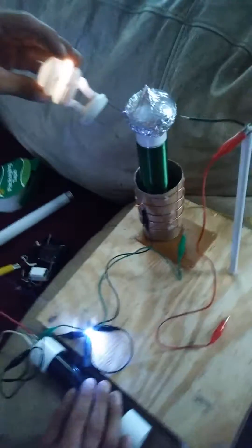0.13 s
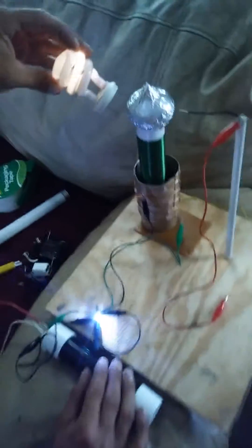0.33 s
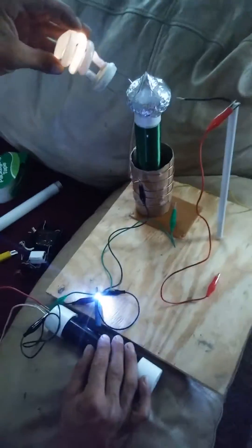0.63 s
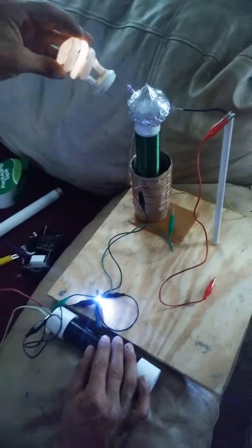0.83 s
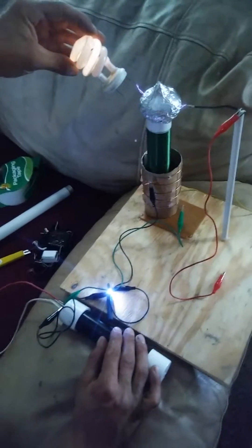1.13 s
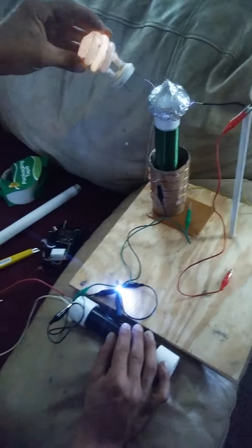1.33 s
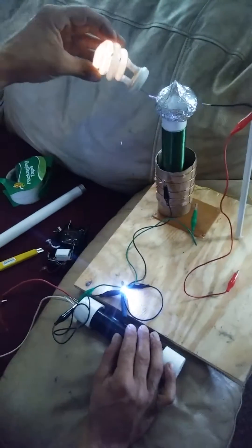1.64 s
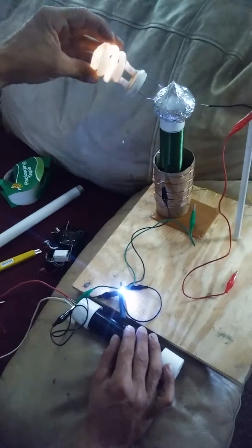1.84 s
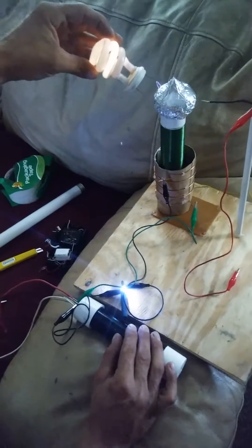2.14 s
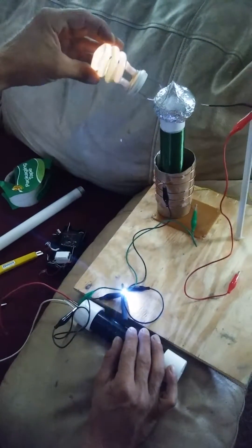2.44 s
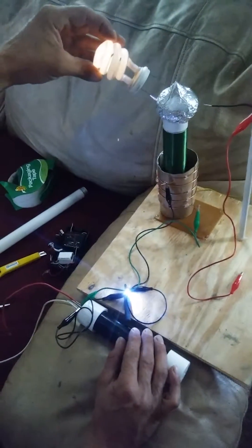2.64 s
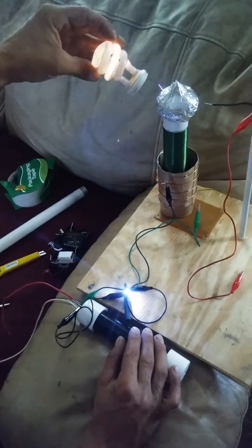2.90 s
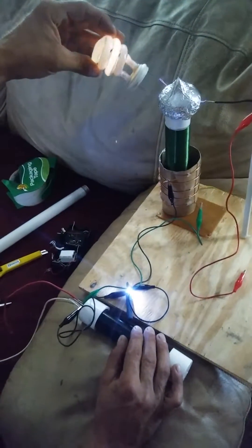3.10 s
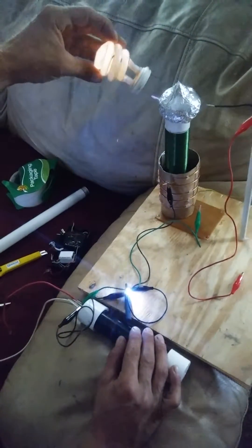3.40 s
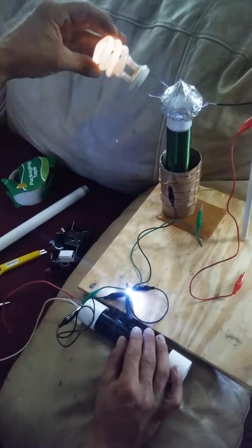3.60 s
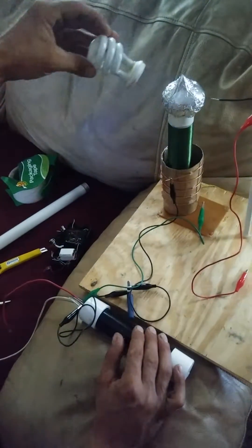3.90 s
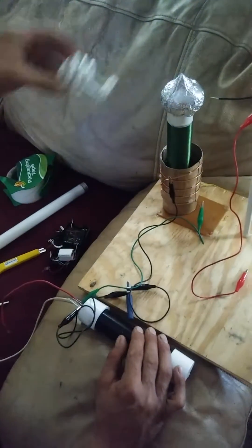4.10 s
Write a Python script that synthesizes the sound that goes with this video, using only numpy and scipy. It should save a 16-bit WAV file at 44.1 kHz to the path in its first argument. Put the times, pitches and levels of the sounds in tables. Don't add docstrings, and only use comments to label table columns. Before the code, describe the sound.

Indoors, near a wooden board, electric sparks snap so fast they form a raspy, sizzling buzz. It is loudest and slightly overloaded at the start, with low thumps and ticks picked up by the microphone wiring, then steadies with shifting treble colour. Near the end it cuts out, leaving a short reverberant tail, quiet room noise and a thin steady whine.

```python
import sys
import numpy as np
from scipy import signal
from scipy.io import wavfile
from scipy.ndimage import uniform_filter1d

SR = 44100
rng = np.random.default_rng(int(sys.argv[2]) if len(sys.argv) > 2 else 0)


def wav_record(signal):
    frames = np.transpose(np.atleast_2d(signal))
    bounded = np.clip(frames, -1, 1)
    quanta = np.round(bounded * 32767).astype(np.int16)
    wavfile.write(sys.argv[1], SR, quanta)


def gain_from_decibels(decibels):
    exponent = np.asarray(decibels, float) / 20
    return 10 ** exponent


N = 187622

# (time [s], sparks so far [count])
SPARK_COUNT = [(0.001, 0), (0.036, 2), (0.1493, 9), (0.229, 14), (0.2594, 16), (0.2901, 18), (0.4706, 30),
               (0.518, 33), (0.7918, 51), (0.8396, 54), (0.8878, 57), (0.9211, 59), (0.9541, 61),
               (0.9875, 63), (1.1413, 72), (1.2503, 79), (1.2806, 81), (1.3132, 83), (1.4075, 89),
               (1.4713, 93), (1.5041, 95), (1.6032, 101), (1.6781, 106), (1.7414, 110), (1.7739, 112),
               (1.909, 121), (1.9558, 124), (2.0053, 127), (2.0822, 132), (2.2024, 140), (2.2513, 143),
               (2.2972, 146), (2.3852, 152), (2.4165, 154), (2.4628, 157), (2.512, 160), (2.5619, 163),
               (2.6111, 166), (2.6428, 168), (2.6913, 171), (2.7488, 175), (2.7805, 177), (2.8272, 180),
               (2.9211, 186), (2.9529, 188), (3.0738, 196), (3.106, 198), (3.155, 201), (3.1878, 203),
               (3.2204, 205), (3.2846, 209), (3.3456, 213), (3.4121, 217), (3.5302, 224), (3.5618, 226),
               (3.5936, 228), (3.6886, 234), (3.7205, 236), (3.7695, 239), (3.8167, 242)]


def firing():
    charge_s, stroke_s, jitter_s = .0148, .0024, .0002
    times = []
    for (start, before), (end, after) in zip(SPARK_COUNT, SPARK_COUNT[1:]):
        count = round(after - before)
        scatter = jitter_s * rng.standard_normal(32)[:count]
        late = round((end - start - count * charge_s) / stroke_s)
        gaps = stroke_s * (np.arange(count) >= count - late) + scatter
        gaps += (end - start - gaps.sum()) / count
        times.append(end - np.cumsum(gaps[::-1])[::-1])
    return np.append(np.concatenate(times), SPARK_COUNT[-1][0])


# (time [s], level [dB])
CRACK_LEVEL = [(0, -5.5), (.3, -7), (.6, -9), (1.1, -10.5), (1.6, -11), (2.3, -11), (3.3, -10.5),
               (4.3, -10)]
# (time [s], place [0-3])
MIC_PLACE = [(0, 0), (.3, .1), (.55, 1), (.8, 1.1), (1.1, 2), (1.5, 2.2), (2.2, 3), (3.3, 2.8), (4.3, 3)]


def cracks(times):
    t = np.arange(N) / SR
    level_db = np.interp(t, *np.transpose(CRACK_LEVEL))
    place = np.interp(t, *np.transpose(MIC_PLACE))
    closeness = np.pi / 2 * np.clip(place - 1, 0, 1)
    clicks = train(times, gain_from_decibels(.6 * rng.standard_normal(len(times))))
    air = through_air(clicks, place, closeness)
    return gain_from_decibels(level_db) * (fringes(air) + board(clicks, closeness))


# (frequency [Hz], level [dB])
CRACK_FAR_COLOUR = [(350, -93), (700, -19), (1300, -10), (1800, -3.5), (2100, -3), (3000, 0), (4000, -3),
                    (6300, 7), (8300, -5.5), (11000, 0), (14000, -10), (15700, 4.5)]
# (frequency [Hz], level [dB])
CRACK_NEAR_COLOUR = [(350, -105), (700, -6.5), (1300, -7), (1800, -5), (2100, 1.66), (3000, -0.4),
                     (4000, 0.4), (6300, 8), (8300, -0.5), (11000, 1.5), (14000, 2), (15700, 2.5)]
# (frequency [Hz], width [Hz], lift [dB], negative for a dip)
CLOSE_RIPPLES = [(3134, 50, 2), (3907, 50, 2), (5560, 120, 2.5), (6050, 100, 1), (13640, 100, 1),
                 (8610, 300, -3), (9600, 300, -2), (10160, 250, 3.5), (11370, 300, -4), (11880, 300, 3.5),
                 (13900, 250, 3), (14200, 250, -3.5), (14600, 300, 3.5), (15050, 300, -3)]


def through_air(clicks, place, closeness):
    wet = reverberation(clicks, place)
    early = early_echoes(clicks, place)
    far = early[0] + early[1] + np.cos(closeness) * wet
    close = early[2] + early[3] + np.sin(closeness) * wet
    far_db = 0.6
    far = gain_from_decibels(far_db) * colour(far, CRACK_FAR_COLOUR)
    return evened(far + colour(close, CRACK_NEAR_COLOUR, CLOSE_RIPPLES))


# (delay [ms], signed size [ratio])
FAR_ECHOES = [(0.113, 1.6), (0.272, 1.25), (0.59, 0.8), (0.907, -1.39), (1.088, 1.21), (1.156, 1.59),
              (1.429, 0.7), (2.109, -0.7), (2.177, -0.91), (2.88, -0.7), (3.424, -1.07), (3.492, -1.8),
              (3.56, -0.79), (3.719, -0.79), (3.923, 0.69), (5.17, 0.87), (5.238, 0.64), (6.576, -0.6),
              (8.39, 0.8), (8.594, -0.59), (9.025, -1.01), (9.093, -0.65), (10.181, 1.5), (10.544, -1.21),
              (10.68, -0.99), (10.952, -0.77), (11.179, 1.28), (12.449, 0.9), (12.585, 0.98),
              (13.515, -0.61), (13.968, 0.61), (14.331, -0.55)]
# (delay [ms], signed size [ratio])
MOVING_ECHOES = [(-0.023, -0.76), (0.113, 0.94), (0.272, 1.3), (0.612, 1.2), (0.93, -1.17), (1.088, 1.07),
                 (1.156, 0.9), (1.27, -0.58), (1.678, -0.66), (2.789, -0.77), (2.857, -1.35), (2.925, -1.1),
                 (3.424, 0.71), (3.56, -1.31), (3.628, -1.03), (3.81, -0.99), (4.014, 0.69), (5.442, -0.79),
                 (6.621, -0.81), (7.415, 0.66), (8.934, -1.17), (9.637, -0.69), (10.023, -0.7), (10.3, 0.9),
                 (10.499, -1.2), (10.72, 1.5), (10.998, -1.16), (11.837, -0.74), (12.018, -0.78),
                 (12.404, 1.23), (12.472, 0.94), (12.653, -0.85), (13.311, 1.03), (14.036, -0.67)]
# (delay [ms], signed size [ratio])
CLOSER_ECHOES = [(-0.023, -0.94), (0.385, -1.72), (0.454, -1.3), (0.862, -0.82), (1.088, 1.13),
                 (1.361, 1.04), (1.497, 0.71), (2.018, -0.75), (2.698, 0.8), (2.834, -1.38), (2.902, -0.96),
                 (3.741, 0.92), (4.218, -0.98), (5.329, 0.5), (6.848, -1.23), (7.8, 1.07), (7.914, -1.41),
                 (8.254, -1.02), (8.707, 0.84), (8.866, -0.74), (9.32, 0.87), (9.728, 0.74), (9.932, -0.94),
                 (10.317, 1.12), (10.658, 1.6), (10.794, 0.97), (11.043, 0.9), (12.336, 1.08),
                 (12.562, -0.9), (13.447, 0.86), (13.56, 0.6), (14.014, -0.6)]
# (delay [ms], signed size [ratio])
NEAR_ECHOES = [(0.113, 1.03), (0.272, 1.26), (0.385, -1.51), (0.454, -0.88), (0.658, 0.86), (0.839, -0.79),
               (0.975, -1.16), (3.628, -0.74), (3.764, 1.34), (4.059, 0.84), (4.24, -0.83), (4.422, 0.9),
               (4.671, 0.69), (5.351, 0.89), (6.281, 0.85), (6.871, -0.98), (7.438, -1.01), (7.506, -0.8),
               (7.778, 0.69), (7.937, -1.43), (8.277, -1.32), (8.753, 0.81), (9.955, -1.46),
               (10.249, -0.87), (10.476, -0.89), (10.93, -0.9), (10.998, -1.19), (11.202, -1.46),
               (12.358, 0.87), (12.608, -1.04), (12.971, -0.74), (13.469, 0.72)]
# (delay [ms], signed size [ratio])
BRIGHT_SNAPS = [
    [(-0.023, 1.72), (0.045, 1.62), (0.136, -0.65), (0.204, -0.84), (0.363, 0.76), (0.499, -0.47),
     (0.839, 0.5), (1.02, -0.45), (1.202, 0.77), (1.383, 0.5), (1.927, -0.69), (7.2, -0.6), (7.7, 1.3),
     (8.3, 0.6), (8.889, -0.51), (10.522, 0.52), (10.816, -0.5)],
    [(-0.068, -1.1), (0.0, -2.25), (0.136, 0.84), (0.204, -1.27), (0.34, -0.56), (0.794, -0.67),
     (1.406, -0.6), (7.2, -1.4), (7.8, 0.8), (8.4, -0.7), (8.662, 0.39), (10.181, -0.49), (10.544, -0.75),
     (11.111, 0.61), (11.179, -0.9), (12.041, 0.47), (12.608, 0.47)],
    [(0.0, -2.58), (0.227, 0.83), (0.363, 0.83), (0.794, -0.87), (1.361, 1.43), (1.429, -1.33),
     (4.49, 0.67), (7.438, 1.6), (8.662, 0.94), (8.912, 0.63), (9.342, -0.96), (10.431, -0.85),
     (10.658, 0.6), (11.088, -0.5)],
    [(-0.023, 1.25), (0.045, 1.55), (0.159, 0.79), (0.771, -0.82), (1.293, 0.6), (1.519, -0.64),
     (7.46, 1.72), (8.685, 0.64), (8.844, 1.55), (9.342, 0.82), (9.728, 0.67), (10.408, 1.01),
     (10.522, 0.68), (11.202, -0.85)],
]


def early_echoes(clicks, place):
    shares = np.cos(np.pi / 2 * np.clip(place - np.arange(4)[:, None], -1, 1))
    echoes = FAR_ECHOES, MOVING_ECHOES, CLOSER_ECHOES, NEAR_ECHOES
    early = []
    for share, dull, bright in zip(shares, echoes, BRIGHT_SNAPS):
        heard = signal.oaconvolve(clicks * share, arrivals(dull, bright))
        early.append(heard[round(.002 * SR):][:N])
    return early


def arrivals(echoes, snaps):
    split_hz, lowest_hz, snap_db = 8500, 1250, 2.3
    dull, bright = (impulses(points) for points in (echoes, snaps))
    below = signal.butter(2, split_hz, fs=SR, output="sos")
    dull = signal.sosfiltfilt(signal.butter(2, lowest_hz, "high", fs=SR, output="sos"), dull)
    bright = bright - signal.sosfiltfilt(below, bright)
    return signal.sosfiltfilt(below, dull) + gain_from_decibels(snap_db) * bright


def impulses(points):
    delay_ms, size = np.transpose(points)
    return train(.002 + delay_ms / 1000, size)[:1000]


def reverberation(clicks, place):
    wet_db = 10.3
    turn_hz = .5 - .14 * place
    phase = 2 * np.pi * (np.cumsum(turn_hz) / SR + np.arange(3)[:, None] / 3)
    shares = np.cos(phase) * np.sqrt(2 / 3)
    wet = signal.oaconvolve(clicks * shares, tails(count=3), axes=1)[:, :N]
    return gain_from_decibels(wet_db) * wet.sum(0)


# (frequency [Hz], time to fall 60 dB [s], share [dB])
ROOM_DECAY = [(300, .15, -8), (800, .28, -4), (1600, .35, 1), (3200, .33, 0), (6400, .305, -1.5),
              (8500, .26, -5), (10000, .24, -5), (16000, .2, -5)]


def tails(count):
    length, spacing = SR // 2, 12
    taps = np.zeros((count, length))
    spots = np.arange(0, length - spacing, spacing)
    at = spots + rng.integers(0, spacing, (count, len(spots)))
    np.put_along_axis(taps, at, rng.choice([-1., 1.], at.shape), 1)
    swell_s = .013
    taps *= np.clip(np.arange(length) / SR / swell_s, .3, 1) ** 2
    hz, t, z = signal.stft(taps, SR, nperseg=128)
    share_db = read(ROOM_DECAY, hz, axis=2)[:, None]
    decay_db = -60 * t / read(ROOM_DECAY, hz)[:, None]
    tail = signal.istft(z * gain_from_decibels(share_db + decay_db), SR, nperseg=128)[1]
    return tail / np.linalg.norm(tail, axis=1, keepdims=True)


# (middle [s], length [s], frequency [Hz], width [Hz], gain [dB])
ECHO_FRINGES = [(0.32, .4, 2670, 170, -11), (0.65, 0.14, 5130, 500, -15), (0.26, 0.26, 1600, 250, -4),
                (0.31, 0.23, 7050, 170, -5), (0.16, 0.074, 6100, 430, -16), (0.34, 0.35, 6700, 300, 3.5),
                (1.2, 0.23, 7050, 250, 2), (0.42, .3, 3900, 150, -6), (0.15, 0.26, 3330, 270, 2),
                (0.66, 0.31, 2160, 550, 3), (.6, 0.37, 8600, 280, -1), (2, 0.69, 11000, 210, 3),
                (1.5, 1.6, 7200, 400, 1), (3.1, 1.5, 6980, 490, 3), (2.6, 0.54, 2800, 600, 1.5),
                (2.4, 2.3, 2890, 180, -3), (2.0, 3.4, 3400, 360, 3.5), (1, 1.1, 15000, 610, -5),
                (5.2, 1.22, 15000, 200, -5.5), (3.72, 0.48, 4500, 400, 2), (0.5, 0.89, 13500, 1000, 9.5),
                (1.1, 1.0, 14700, 400, 8), (1.5, .9, 13700, 700, 1), (0.72, 0.66, 7400, 450, 3.5),
                (0.25, 0.72, 3360, 200, -5), (0.32, 0.59, 5500, 400, -5.5), (1.3, 1.4, 9000, 300, 5.5),
                (0.54, 0.61, 4430, 460, 5), (1.4, .9, 11000, 300, -4), (2.7, 2.8, 10400, 340, -2.5),
                (2.5, 2.2, 11000, 380, 4.5)]


def fringes(x):
    hz, t, z = signal.stft(x, SR, nperseg=512)
    gain_db = 0
    for middle_s, length_s, centre_hz, width_hz, db in ECHO_FRINGES:
        across = (2 * (hz[:, None] - centre_hz) / width_hz) ** 2
        along = (2 * (t - middle_s) / length_s) ** 4
        gain_db = gain_db + db * np.exp(-across - along)
    return signal.istft(z * gain_from_decibels(gain_db), SR, nperseg=512)[1][:N]


# (frequency [Hz], level [dB rms], time to fall 60 dB [s], only close up [0 or 1])
BOARD_TONES = [
    (750, -37, 0.08, 1),
    (945, -33.5, 0.06, 0),
    (1150, -37, .04, 0),
]


def board(clicks, closeness):
    t = np.arange(SR // 2) / SR
    out = 0
    for k, (hz, db, t60_s, near) in enumerate(BOARD_TONES):
        ring = gain_from_decibels(-60 * t / t60_s) * np.sin(2 * np.pi * hz * t)
        tone = evened(signal.oaconvolve(clicks, ring)[:N])
        out = out + (-1) ** k * gain_from_decibels(db) * np.sin(closeness) ** (2 * near) * tone
    return out


# (time [s], level [dB])
WIRING_COUPLING = [(0, -6), (.3, 0.5), (.55, -16), (.95, -8.5), (1.15, -6), (1.4, -2), (1.65, -4),
                   (2.0, -9.5), (2.3, -10), (2.5, -3.5), (2.8, -7), (3.1, -4.5), (3.4, -8), (3.75, -10)]


def pops(times):
    coupling_db = np.interp(times, *np.transpose(WIRING_COUPLING))
    luck = np.clip(rng.standard_normal((len(times), 3)), -2, 2)
    tick = gain_from_decibels(-13 + 0.3 * coupling_db + 2.57 * luck[:, 0])
    swing = gain_from_decibels(-24.5 + coupling_db) * (1 + .5 * luck[:, 2])
    thump = gain_from_decibels(-31.5 + 0.36 * coupling_db) * (.5 + luck[:, 1])
    start, swing_lag_s = times - .0017, .0015
    out = signal.oaconvolve(train(start, tick), pop(0.000092, 173, dip=0.36))[:N]
    swing_pop = pop(0.001, 110, dip=0, rise_s=0.0005)
    out -= signal.oaconvolve(train(start + swing_lag_s, swing), swing_pop)[:N]
    out += signal.oaconvolve(train(start, thump), pop(0.0018, 45, dip=0))[:N]
    wiring_hz, deepest_hz = 1460, 40
    out = band(band(out, wiring_hz, "low"), wiring_hz, "low")
    return band(out, deepest_hz, "high") + stray_arcs()


# (time [s], peak level [dB], polarity [-1 or 1], sharpness [0-1])
STRAY_ARCS = [(.0183, -3, -1, 1), (.0365, -8, 1, 1), (.0826, -12, 1, 1), (.0990, -21, -1, 0),
              (.1163, -9, 1, 1), (.1495, -23, 1, 0), (.2303, -21, -1, 0), (.2457, -14, -1, .5),
              (.2612, -23, -1, 0), (1.3156, -25, -1, 0), (1.6349, -22, -1, 0), (1.6499, -22, -1, 0),
              (3.1898, -18, -1, 0), (3.2218, -23, -1, 0), (3.7536, -24, -1, 0)]


def stray_arcs():
    s, peak_db, polarity, sharp = np.transpose(STRAY_ARCS)
    size = gain_from_decibels(peak_db) * polarity
    sharp_clicks = train(s - .002, size * .8 * sharp)
    round_clicks = train(s - .002, size * (1 - .6 * sharp))
    arcs = signal.oaconvolve(sharp_clicks, pop(.005, 90, dip=1.3, rise_s=.0005))[:N]
    return arcs + signal.oaconvolve(round_clicks, pop(.004, 90, dip=0, rise_s=.0008))[:N]


def pop(width_s, cut_hz, dip, rise_s=.00025):
    t = np.arange(-.002, .05, 1 / SR)
    kick = np.exp(-np.maximum(t, 0) / width_s - (np.minimum(t, 0) / rise_s) ** 2)
    kick -= dip * np.exp(-((t + 1.8 * rise_s) / .00025) ** 2)
    shape = band(kick, cut_hz, "high")
    return shape / shape.max()


# (frequency [Hz], level [dB rms])
SUPPLY_WHINE = [
    (1001, -58.5),
    (1915.5, -48.5),
    (3831, -65),
]


def supply():
    t = np.arange(N) / SR
    whine = sum(np.sqrt(2) * gain_from_decibels(db) * np.sin(2 * np.pi * hz * t) for hz, db in SUPPLY_WHINE)
    buzz_hz, buzz_db, mains_hz = 7410, -64, 60
    wobble = np.cumsum(uniform_filter1d(rng.standard_normal(N), 300)) * 0.091
    gate = np.sqrt(.5 + .5 * np.cos(2 * np.pi * mains_hz * t))
    buzz = gate * np.sin(2 * np.pi * buzz_hz * t + wobble)
    return whine + gain_from_decibels(buzz_db) * evened(buzz)


# (frequency [Hz], level [dB])
HUM_COLOUR = [(41, -68), (70, -18), (199, -10.5), (330, -3), (494, -10), (593, -11.5), (1000, -10.5),
              (1310, -11.5), (1890, -11), (2070, -9), (5500, -24), (7390, -26), (8660, -34), (16000, -32)]


def room_hum():
    hum_db = -36.5 - 11.5
    return gain_from_decibels(hum_db) * evened(colour(rng.standard_normal(N), HUM_COLOUR))


def train(times, sizes):
    out = np.zeros(N)
    np.add.at(out, np.clip(np.round(times * SR).astype(int), 0, N - 1), sizes)
    return out


def colour(x, points, rings=()):
    hz = abs(np.fft.fftfreq(8192, 1 / SR))
    gain_db = read(points, hz)
    for centre_hz, width_hz, db in rings:
        gain_db = gain_db + db / (1 + (2 * (hz - centre_hz) / width_hz) ** 2)
    spectrum = np.exp(np.conj(signal.hilbert(np.log(gain_from_decibels(gain_db)))))
    taps = np.fft.ifft(spectrum).real[:2048]
    return signal.oaconvolve(x, taps)[:N]


def read(points, hz, axis=1):
    columns = np.transpose(points)
    return np.interp(np.log(hz + 1), np.log(columns[0] + 1), columns[axis])


def evened(x):
    return x / np.sqrt(np.mean(x ** 2) + 1e-20)


def band(x, hz, kind):
    return signal.sosfilt(signal.butter(2, hz, kind, fs=SR, output="sos"), x)


def scene():
    times = firing()
    return (cracks(times) + pops(times) + supply() + room_hum())[None]


def top_cut(x):
    return signal.sosfilt(signal.butter(12, 17020, fs=SR, output="sos"), x)


def record(dry):
    ceiling, edge_hz = .9, 15745
    limited = dry / (1 + abs(dry / ceiling) ** 6) ** (1 / 6)
    edge = signal.firwin(1501, edge_hz, window=("kaiser", 9), fs=SR)[None]
    mix = signal.oaconvolve(limited, edge, "same")
    return top_cut(mix)


dry = scene()
out = record(dry)
wav_record(out)
```